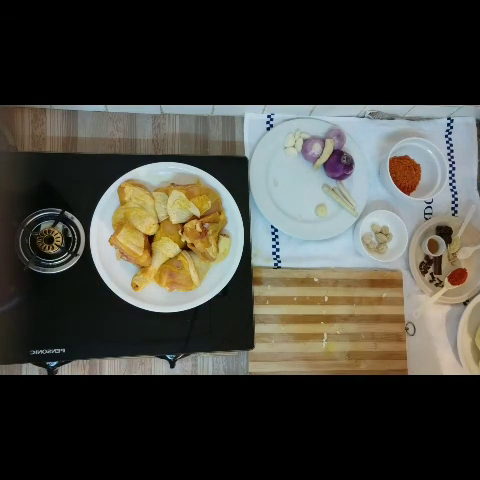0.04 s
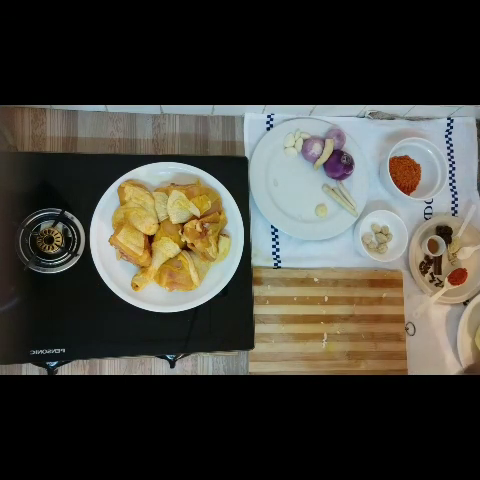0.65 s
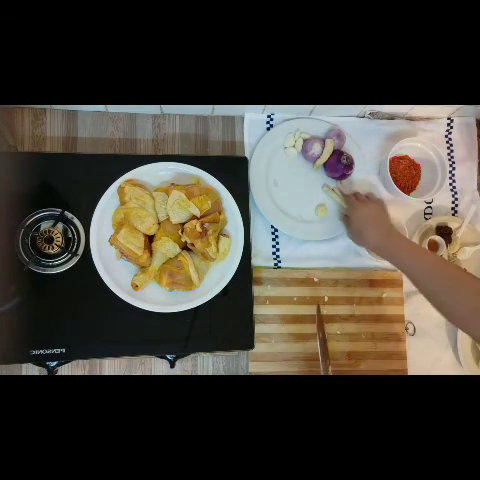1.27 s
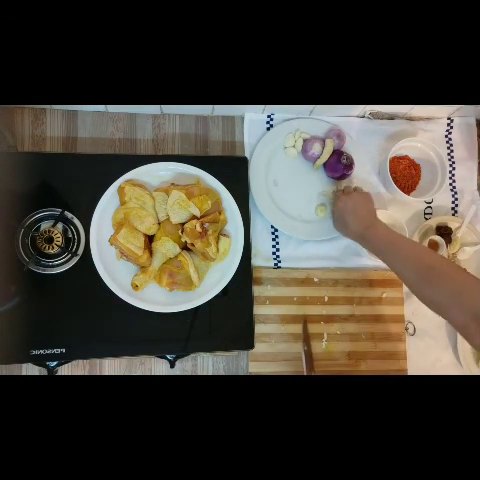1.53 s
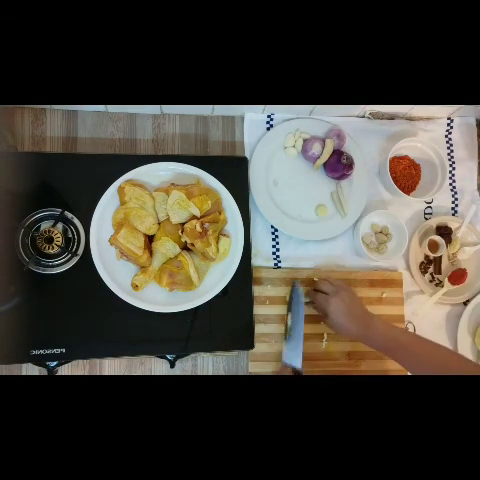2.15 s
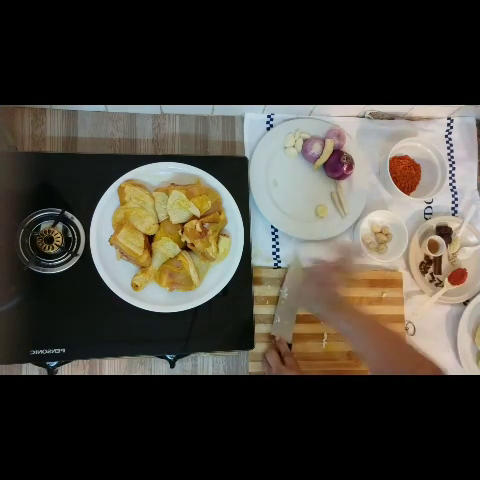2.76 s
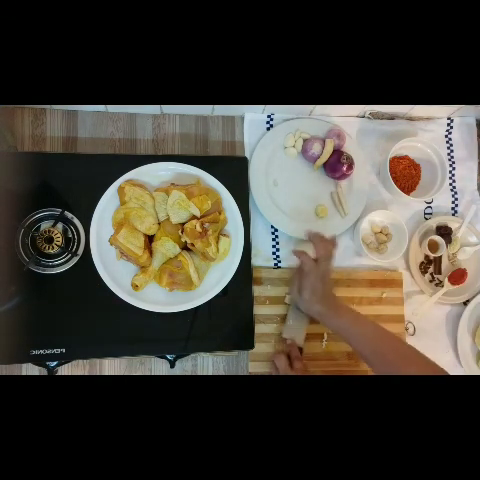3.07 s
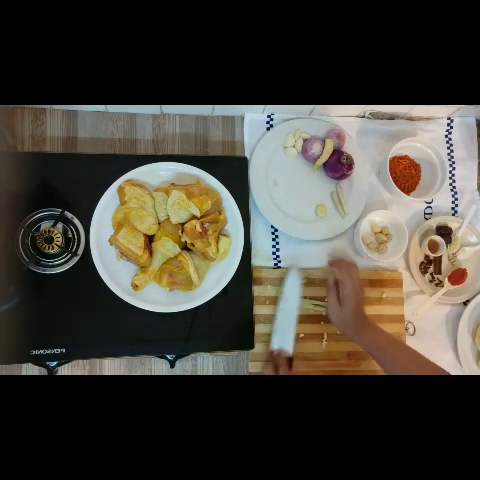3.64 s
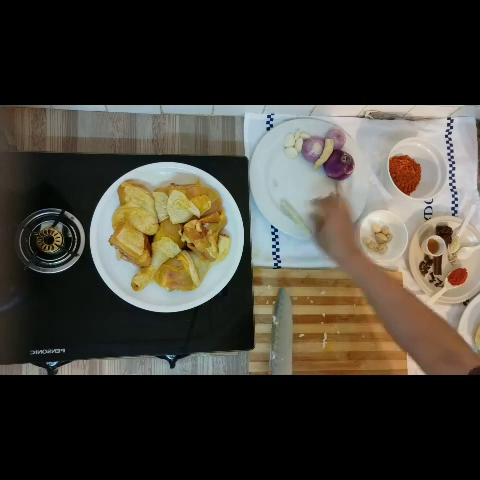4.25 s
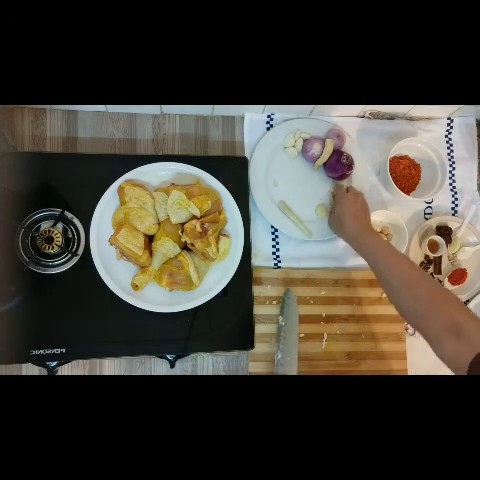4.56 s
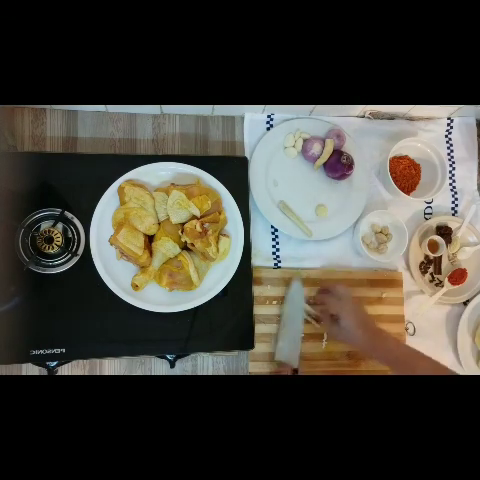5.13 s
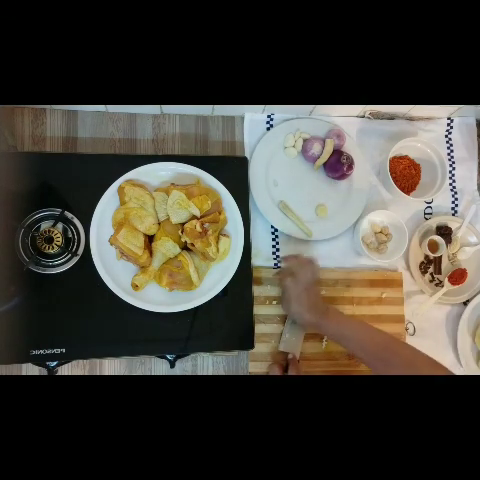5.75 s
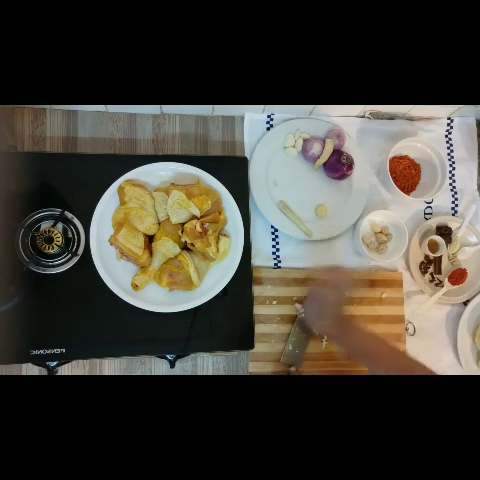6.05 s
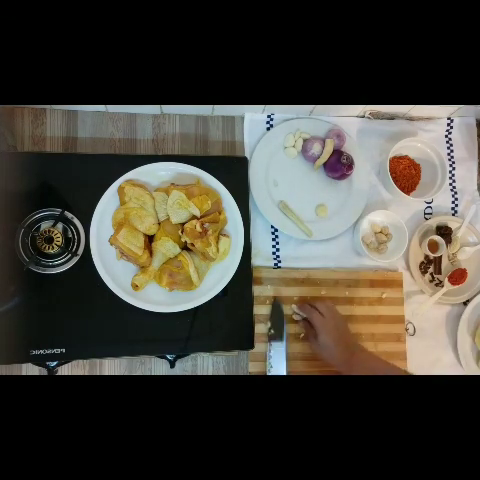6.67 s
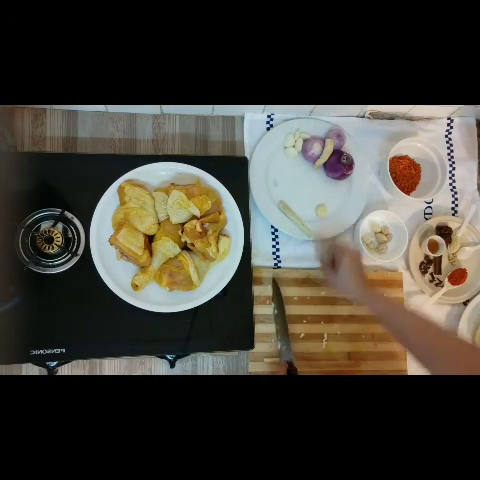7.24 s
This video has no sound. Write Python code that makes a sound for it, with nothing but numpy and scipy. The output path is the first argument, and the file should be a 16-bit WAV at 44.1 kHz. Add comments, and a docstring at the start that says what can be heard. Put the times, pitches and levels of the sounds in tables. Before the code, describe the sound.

Loud thumps of a knife crushing stalks on a wooden cutting board, with small clinks and hand rustles in a quiet kitchen.

```python
"""A cook crushes garlic and lemongrass under the flat of a knife on a wooden board, over faint hum and hiss.
First hands rustle and the blade taps lightly. From 2.9 s the palm smacks the blade three times: board and
counter boom, the kitchen rings, a limiter holds each smack down. Taps, scrapes and rustling lead to two
more smacks at 5.7 and 6.2 s, and carry on to the end."""
import sys
import numpy as np
from scipy import signal
from scipy.fft import rfft, irfft
from scipy.io import wavfile
from scipy.ndimage import uniform_filter1d, minimum_filter1d

SR = 44100
rng = np.random.default_rng(int(sys.argv[2]) if len(sys.argv) > 2 else 0)


def master(y):
    """Save y as 16-bit WAV."""
    cut = np.clip(np.atleast_2d(y).T, -1, 1)
    pcm = np.round(cut * 32767)  # scale
    wavfile.write(sys.argv[1], SR, pcm.astype(np.int16))


N = 326340
TIME = np.arange(N) / SR


# palm on blade, blade on board; where the palm lands sets the blade's pitch and ring:
# start_s, force_db, rise_s, thud_db, body_db, knock_db, clack_db, clank_db, steel_db, pitch_ratio, ring_0_1
SMACKS = [(2.9192, -7, 0.0041, 8.5, 1.5, 2, -7.5, -6.5, 5, 0.98, 0.85),
          (3.247, -7.5, 0.0037, -4, -8.5, -9, -3, -3, -10, 1.036, 0.2),
          (3.4872, -7, .0046, 9, 8, 7.5, 0, -9.5, 2, 1, 0.34),
          (5.7070, -9.5, 0.0043, 16, 12, 13, 4.5, 0, 4, 1.2, 0.02),
          (6.2112, -21.5, .00267, 7.5, 5, 8, 15, -20, 15, .88, 0.1),
          (6.2135, -17.5, 0.0048, 18, 16, 8.5, 10.5, 9.5, -7, .88, 0.04)]
def palm_smacks():
    """Five hard blows on the flat of the knife; the last lands as a double contact."""
    return impacts(SMACKS, room_db=-6.5)


# light contacts: start_s, force_db, rise_s, thud_db, body_db, knock_db, clack_db, clank_db, steel_db
TAPS = [(0.835, -47, 0.0016, -23, -22, -26, -20, -12, 13),
        (0.8857, -34.5, 0.0011, -17, -26, -26, -14, -4, 8.5),
        (2.4869, -30.5, 0.003, 16.5, 0, -5, 9.5, 8, -10), (3.8375, -36.5, 0.0044, 6, 3, 6, -1, 3, 1),
        (3.858, -39, 0.004, -10, -3, 1, 5, 4, -2), (3.924, -37, 0.0035, -19, -17, -16, -23, -28, 6),
        (4.295, -52, 0.005, 3, 1, 4, -5, -11, 14), (5.075, -42, 0.0031, 11, 0, 7, 11, 7, -1),
        (5.086, -44.5, 0.0029, -2, 0, 12, 17.5, 11, -7), (5.3624, -32.5, 0.0052, 17.5, 6, 7, 12, -0.5, 6),
        (5.3695, -33, 0.0049, 15, 3, 3.5, 11.5, 8.5, -1.5), (6.1201, -39, 0.0045, 25, -1, 13, 13, 5, 4.5),
        (6.897, -39.5, 0.004, 8.5, 1, 4, 2, -12, -2), (7.0479, -45, 0.0029, 10, 13, -3, 3, 17.5, 10),
        (7.0711, -45.5, 0.0045, 4, 6, 8, 6, 14, 4), (7.081, -47.5, 0.0045, 2, 10, 3, 5, 6, 0),
        (7.1285, -47.5, 0.00356, 11, 9, 8, 12, 22, 1), (7.168, -53, 0.00355, -10, -2, 8, 14, 16, -4)]
def light_taps(pitch_ratio=0.83, ring=0.4):
    """Blade, stalks and fingers touch down, with no palm to tense the blade."""
    return impacts([(*row, pitch_ratio, ring) for row in TAPS], room_db=-4.5)


def impacts(rows, room_db, ragged_share=0.55):
    """Contacts heard directly, through the board and off the walls, which partly even out the crunch."""
    push, crunch, spill = contacts(rows)
    room = np.sqrt(ragged_share) * kitchen(crunch) + np.sqrt(1 - ragged_share) * kitchen(spill)
    return crunch + board(push) + amp(room_db) * room


# base spectrum of every contact: freq_hz, level_db
CONTACT_COLOUR = [(30, -36.5), (100, -10), (4500, -3.5), (7200, -3), (8600, 3), (10500, -2), (12000, -11.5),
                  (14000, -18), (15500, -23.5)]
# bending modes of the free blade: pitch_hz, half_width_hz, boost_db
BLADE_MODES = [(1380, 196, 18.5), (1920, 193, 16.5), (2440, 410, 13), (3420, 130, 15), (4370, 300, 4.5),
               (6310, 170, 5.5), (7300, 296, 2)]
def contacts(rows, size=4096):
    """Each contact pushes the board, crunches briefly at the blade and spills sound in all directions."""
    hz = np.fft.rfftfreq(size, 1 / SR)
    push, crunch, spill = np.zeros(N), np.zeros((2, N)), np.zeros((1, N))
    for start_s, force_db, rise_s, thud, body, knock, clack, clank, steel, pitch_ratio, ring in rows:
        modes_db = sum(db * np.exp(-((hz / pitch_ratio - mode_hz) / width_hz) ** 2)
                       for mode_hz, width_hz, db in BLADE_MODES)
        colour_hz_db = [(140, thud), (328, body), (520, knock), (806, knock),
                        (1060, clack), (1650, clank), (3100, 0), (8300, steel)]
        spectrum_db = curve(colour_hz_db, hz) + curve(CONTACT_COLOUR, hz) + ring * modes_db
        click = amp(force_db) * min_phase(spectrum_db)
        add(crunch, start_s, signal.fftconvolve(crush(rise_s, size), click[None], axes=1))
        add(push, start_s + rise_s, click)
        add(spill, start_s + rise_s, np.sqrt(rise_s * SR) * click)
    return push, crunch, spill


def crush(rise_s, size, smoothing_ratio=0.15):
    """A burst of tiny fractures: ragged in fine detail, even in strength from bass to treble."""
    hz = np.fft.rfftfreq(size, 1 / SR)
    age = TIME[:size] / rise_s
    burst = noise_pair(size, directness=2.5) * (age * np.exp(1 - age)) ** 4
    power = (abs(rfft(burst)) ** 2).mean(0)
    cumulative = np.cumsum(power / power.mean()) * hz[1]
    reach_hz = smoothing_ratio * hz + hz[1]
    band_power = np.interp(hz + reach_hz, hz, cumulative) - np.interp(hz - reach_hz, hz, cumulative)
    whitener = min_phase(-10 * np.log10(band_power / (2 * reach_hz)))
    return signal.fftconvolve(burst, whitener[None], axes=1)[:, :size]


# modes of the board on the counter: pitch_hz, relative_db, t60_before_damping_s
BOARD_MODES = [(88.7, -3, 0.95), (141, 5, 0.48), (221.2, -2, 0.71), (291.4, 6.5, 0.23), (320, 9, 0.17),
               (435, 1, 0.45), (498, -3.5, 0.67), (523, 16.5, 0.05), (620, 21, 0.033), (714, 6, 0.25),
               (840, 2, 0.048), (810, -14, 0.39), (864, -3, 0.39)]
def board(push, ring_db=-28.5, damping=1.48, shove_db=-19.0, shove_samples=45):
    """The board gives one short shove of air, then rings with the counter in its low modes."""
    t = TIME[:SR]
    response = amp(ring_db) * sum(amp(db - 60 * damping * t / t60_s) * np.sin(2 * np.pi * hz * t)
                                  for hz, db, t60_s in BOARD_MODES)
    add(response, 0, amp(shove_db) * np.hanning(shove_samples))
    return signal.fftconvolve(push, response)[:N]


# spectrum of the reflections, with a steep treble cut above 14 kHz: freq_hz, relative_db
TAIL_COLOUR = [(80, 8.5), (190, -4.5), (300, -0.5), (700, 1), (2000, -5), (4500, -7), (9000, -4),
               (14000, -2.5), (14700, -37)]
# room decay: freq_hz, t60_s
ROOM_DECAY = [(100, 0.47), (500, 0.39), (1300, 0.37), (4000, 0.46), (9000, 0.39), (14000, 0.27)]
def kitchen(x, build_s=0.00031):
    """Dense reflections off near, hard walls; each band dies at its own speed."""
    hz, t, bands = signal.stft(noise_pair(SR, TAIL_COLOUR), SR, nperseg=256)
    decay = amp(-60 * t / curve(ROOM_DECAY, hz)[:, None])
    tail = signal.istft(bands * decay, SR, nperseg=256)[1][:, :SR]
    tail *= 1 - np.exp(-(TIME[:SR] / build_s) ** 2)
    return signal.fftconvolve(x, tail / np.linalg.norm(tail[0]), axes=1)[:, :N]


# fingers over stalks, cloth and board: start_s, length_s, level_db, fizz_before_boost_db
BRUSHES = [(0.245, 0.038, -62.5, 4), (0.29, 0.082, -58, 0.5), (0.423, 0.1, -58.5, -2.5),
           (0.586, 0.086, -56.5, -5.5), (0.673, 0.13, -54.5, -16), (0.917, 0.075, -53.5, 1),
           (1.173, 0.071, -50.5, -13), (1.244, 0.097, -52.5, -18), (1.383, 0.069, -53.5, -2.5),
           (1.477, 0.16, -54, -11), (1.648, 0.24, -56.5, -9), (1.953, 0.11, -51.5, -12),
           (2.095, 0.16, -63.5, -1), (2.233, 0.083, -46, -17), (2.58, 0.03, -53, -31),
           (3.143, 0.13, -59, -0.5), (3.4, 0.19, -52, -10), (3.81, 0.15, -49.5, -7),
           (4.05, 0.047, -56.5, -6.5), (4.33, 0.13, -54, -7.5), (4.466, 0.48, -47.5, -7),
           (4.578, 0.16, -40, -7.5), (4.75, 0.24, -54, -7), (5.004, 0.21, -57.5, -2.5),
           (5.255, 0.12, -58, -4.5), (5.54, 0.088, -67, 6.5), (5.94, 0.064, -51, -8.5),
           (6.35, 0.14, -57, -5.5), (6.618, 0.028, -49.5, -11), (6.713, 0.21, -49, -17.5),
           (7.004, 0.095, -50.5, -10), (7.285, 0.066, -51.5, -13)]
# soft skin friction: freq_hz, relative_db
SKIN_COLOUR = [(500, -18), (1500, -13), (3000, -17.5), (5000, -8.5), (7000, -4), (8400, 8), (10000, 0),
               (12000, -30), (15000, -51)]
# dry fizz: freq_hz, relative_db
FIZZ_COLOUR = [(500, -25), (1500, -8), (3000, -3), (5000, 3.5), (7200, 4), (9000, 12), (10600, 9.5),
               (12500, -1), (14000, -3.5), (14600, -38)]
def hands(fizz_boost_db=8.0, fidget_db=-64, fidget_swing_db=3, fidget_fizz_db=-5):
    """Skin brushes softly, fizzes on dry things, and never quite rests between strokes."""
    fidget = amp(fidget_db + fidget_swing_db * wander(rate_hz=24))
    skin_gain = strokes([row[:3] for row in BRUSHES], release_db_per_s=141)
    fizz_rows = [(start_s, length_s, db + fizz_db) for start_s, length_s, db, fizz_db in BRUSHES]
    fizz_gain = np.hypot(strokes(fizz_rows, release_db_per_s=162), amp(fidget_fizz_db) * fidget)
    skin = rub(np.hypot(skin_gain, fidget), SKIN_COLOUR, grain_db=0.4, grain_hz=120, patchy_db=1.5)
    fizz = rub(fizz_gain, FIZZ_COLOUR, grain_db=0.2, grain_hz=300, patchy_db=3.5)
    return skin + amp(fizz_boost_db) * fizz


# forearm slides: start_s, length_s, level_db
REACHES = [(0.42, 0.14, -56), (1.25, .13, -55.5), (1.565, 0.042, -61), (1.735, 0.046, -62.5),
           (1.86, 0.055, -57), (2.12, 0.084, -56.5), (2.64, 0.15, -54), (4.055, 0.036, -67),
           (6.735, 0.47, -54)]
# cloth friction: freq_hz, relative_db
CLOTH_COLOUR = [(1500, -14), (3300, -11), (4400, 2.5), (5600, 1.5), (7000, 0.5), (12000, -31), (15000, -60)]
def forearm():
    """The forearm slides over cloth, lower in pitch than the fingers."""
    gain = strokes(REACHES, release_db_per_s=102)
    return rub(gain, CLOTH_COLOUR, grain_db=2.5, grain_hz=140, patchy_db=3.5)


# blade drags: start_s, length_s, level_db
DRAGS = [(2.73, 0.075, -61.5), (3.16, 0.06, -59), (3.835, 0.043, -54), (5.55, 0.067, -60),
         (6.62, 0.08, -59), (6.79, 0.13, -60), (7.045, 0.03, -60), (7.21, 0.15, -58.5)]
# steel on wood: freq_hz, relative_db
SCRAPE_COLOUR = [(300, -17), (450, -8), (560, 8.5), (700, -3), (900, -4), (1700, -11), (3000, -22),
                 (8000, -44)]
def blade_scrapes():
    """The blade drags over the wood with a low rasp."""
    gain = strokes(DRAGS, release_db_per_s=171)
    return rub(gain, SCRAPE_COLOUR, grain_db=2, grain_hz=80, patchy_db=4.5)


def strokes(rows, release_db_per_s, rise_share=0.42, sag_db_per_s=20):
    """Joint gain of sliding movements: each gathers speed, eases, and fades once the hand stops."""
    power = np.zeros(N)
    for start_s, length_s, level_db in rows:
        t = TIME - start_s
        swell = np.sin(np.pi / 2 * np.clip(t / (rise_share * length_s), 0, 1))
        sag_db = sag_db_per_s * np.clip(t, 0, length_s)
        release_db = release_db_per_s * np.clip(t - length_s, 0, 1)
        power += (swell * amp(level_db - sag_db - release_db)) ** 2
    return np.sqrt(power)


def rub(gain, colour, grain_db, grain_hz, patchy_db):
    """Friction: a fizz of tiny slips that clump as the surfaces catch."""
    slips = patchy(noise_pair(N, colour), patchy_db)
    clumps = amp(grain_db * wander(grain_hz))
    return gain * unit_rms(slips * clumps)


def patchy(x, depth_db, patch_bins=9, patch_frames=27):
    """Random patches of the spectrum swell and fade, making the rub uneven."""
    bands = signal.stft(x, nperseg=256)[2]
    patches = uniform_filter1d(rng.standard_normal(bands.shape[1:]), patch_bins, axis=0)
    patches = uniform_filter1d(patches, patch_frames, axis=1)
    return signal.istft(bands * amp(depth_db * unit_rms(patches)), nperseg=256)[1][:, :N]


# hiss and rumble spectrum: freq_hz, relative_db
HISS_COLOUR = [(20, 8), (40, -0.5), (72, -9), (120, -4), (178, -19.5), (300, -10.5), (360, -16.5),
               (600, -8.5), (850, -12), (3100, -17.5), (5850, -20), (8620, -10.5), (12400, -21),
               (14200, -32), (14700, -66)]
# appliance tones: pitch_hz, level_db
HUM_TONES = [(236.9, -78), (301.5, -65.5), (398.4, -74.5), (602.9, -76.5), (1001, -76)]
def background(hiss_db=-55, waver_rad=0.31, flutter_depth=0.037):
    """The wavering hum of an appliance over steady hiss and rumble."""
    hum = np.zeros(N)
    for pitch_hz, level_db in HUM_TONES:
        tone = np.sqrt(2) * np.sin(2 * np.pi * pitch_hz * TIME + waver_rad * wander(rate_hz=5.1))
        hum += amp(level_db) * tone * (1 + flutter_depth * wander(rate_hz=20))
    return hum + amp(hiss_db) * noise_pair(N, HISS_COLOUR)


# left-right likeness: freq_hz, coherence_0_1
COHERENCE = [(60, 0.95), (300, 0.87), (640, 0.27), (1400, 0.18), (3000, 0.016)]
def noise_pair(size, colour=None, directness=1):
    """Noise at two microphones: alike in the bass, and further up the more directly it arrives."""
    hz = np.fft.rfftfreq(size, 1 / SR)
    left, independent = rfft(rng.standard_normal((2, size)))
    coherence = curve(COHERENCE, hz / directness)
    spectra = np.array([left, coherence * left + np.sqrt(1 - coherence ** 2) * independent])
    if colour is not None:
        spectra *= amp(curve(colour, hz))
    return unit_rms(irfft(spectra, size))


def wander(rate_hz):
    """Smooth random motion, rms 1."""
    hz = np.fft.rfftfreq(N, 1 / SR)
    return unit_rms(irfft(rfft(rng.standard_normal(N)) * np.exp(-(hz / rate_hz) ** 2), N))


def min_phase(gain_db):
    """The minimum-phase click with this spectrum."""
    log_gain = np.log(amp(np.r_[gain_db, gain_db[-2:0:-1]]))
    return np.fft.ifft(np.exp(np.conj(signal.hilbert(log_gain)))).real


def amp(db):
    """Decibels to gain."""
    return 10 ** (np.asarray(db) / 20)


def unit_rms(x):
    """Scales to rms 1."""
    return x / np.sqrt(np.mean(x ** 2) + 1e-20)


def curve(points, hz):
    """Interpolates a table over log frequency."""
    points_hz, values = np.transpose(points)
    return np.interp(np.log(hz + 1), np.log(points_hz + 1), values)


def add(mix, start_s, sound):
    """Mixes a sound in at start_s."""
    part = mix[..., round(start_s * SR):][..., :sound.shape[-1]]
    part += sound[..., :part.shape[-1]]


def scene():
    """Knife work and handling over the quiet of the kitchen."""
    sliding = blade_scrapes() + forearm()
    return palm_smacks() + light_taps() + hands() + sliding + background()


def limiter(x, ceiling_db, recovery_db_per_s=150, window_samples=101):
    """Ducks ahead of each peak, then recovers about as fast as the room decays, flattening the tail."""
    over_db = np.maximum(20 * np.log10(abs(x).max(0) + 1e-9) - ceiling_db, 0)
    held_db = -minimum_filter1d(-over_db, window_samples)
    recovery_db = TIME * recovery_db_per_s
    duck_db = np.maximum.accumulate(held_db + recovery_db) - recovery_db
    return x * amp(-uniform_filter1d(duck_db, window_samples))


# microphone mismatch: freq_hz, left_minus_right_db
MIC_BALANCE = [(100, -0.5), (600, 0.5), (2400, -0.5), (4400, 0), (8500, -5.5), (11000, 8), (13500, 0.5)]
def record(dry, soft_clip_db=-2, cutoff_hz=15600):
    """Two unequal microphones, the limiter, rounded peaks and a low-pass."""
    tilt_db = curve(MIC_BALANCE, np.fft.rfftfreq(N, 1 / SR)) / 2
    mics = irfft(rfft(dry) * amp([tilt_db, -tilt_db]), N)
    limited = limiter(mics, ceiling_db=-9.5)
    rounded = limited / (1 + (limited / amp(soft_clip_db)) ** 8) ** (1 / 8)
    low_pass = signal.firwin(255, cutoff_hz, window=("kaiser", 9), fs=SR)
    return signal.oaconvolve(rounded, low_pass[None], "same")


dry = scene()
out = record(dry)
master(out)
```